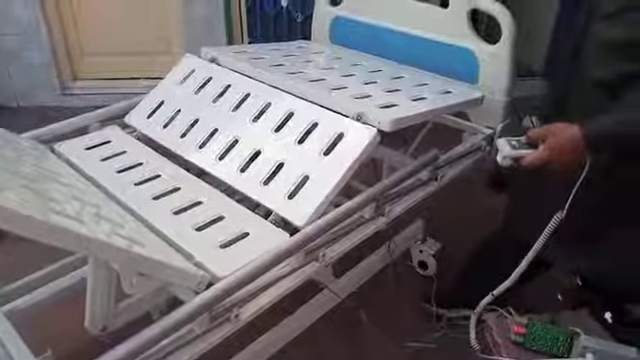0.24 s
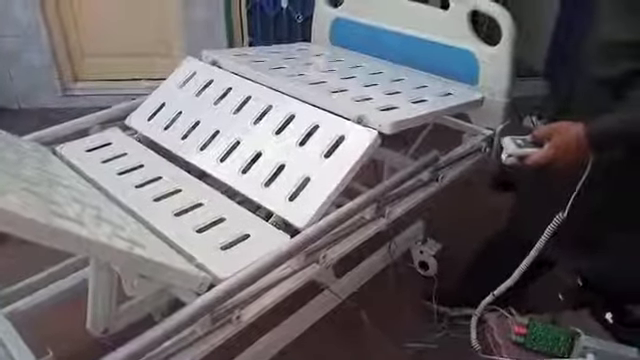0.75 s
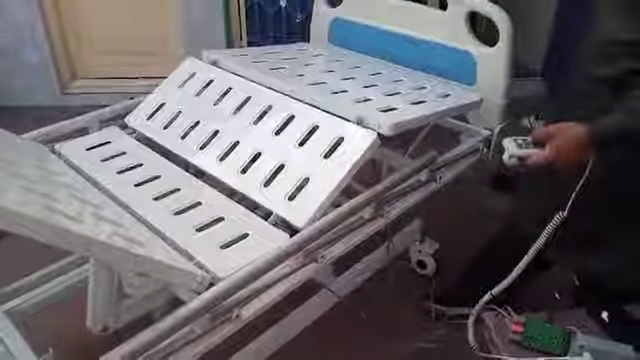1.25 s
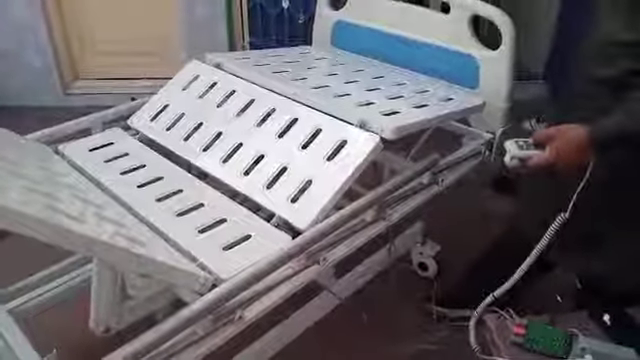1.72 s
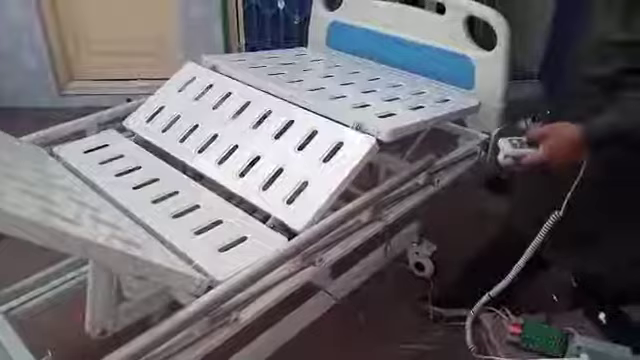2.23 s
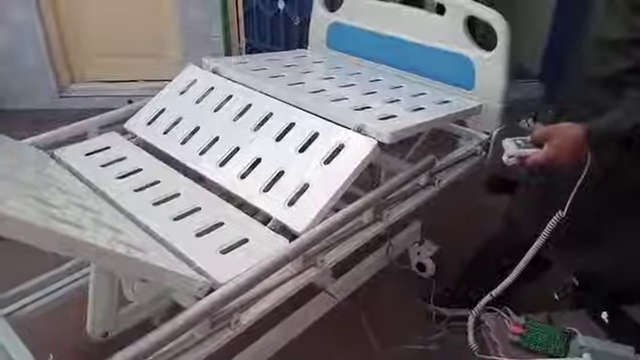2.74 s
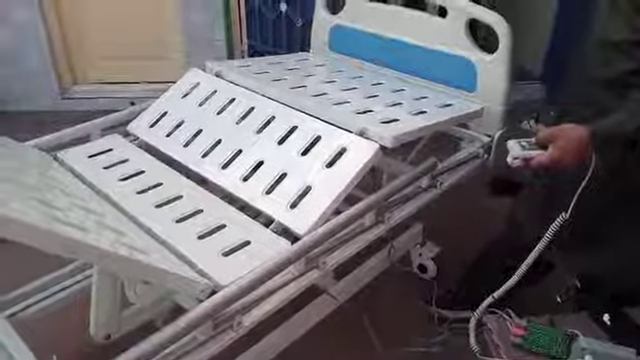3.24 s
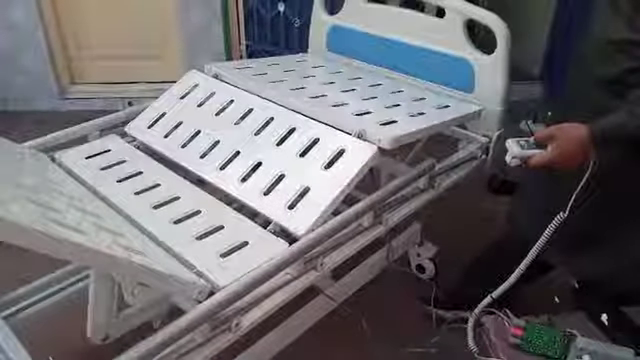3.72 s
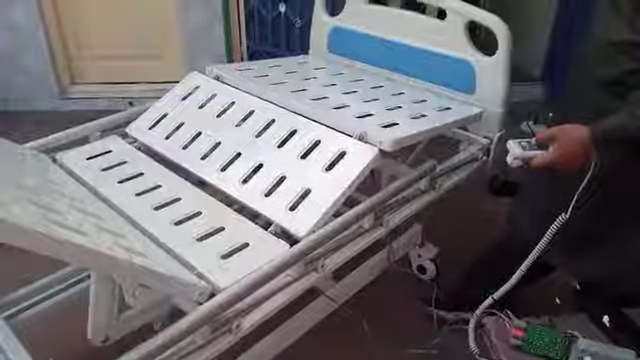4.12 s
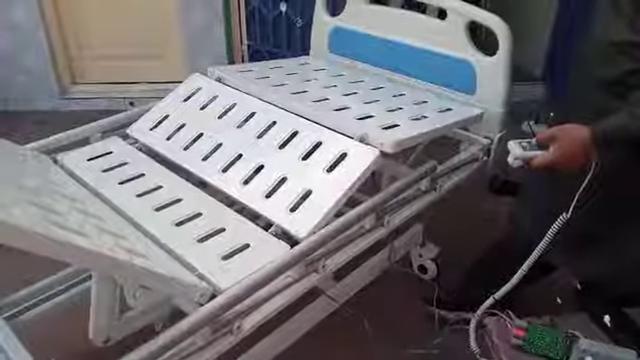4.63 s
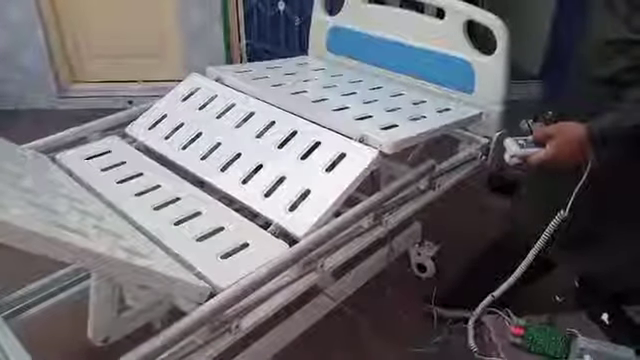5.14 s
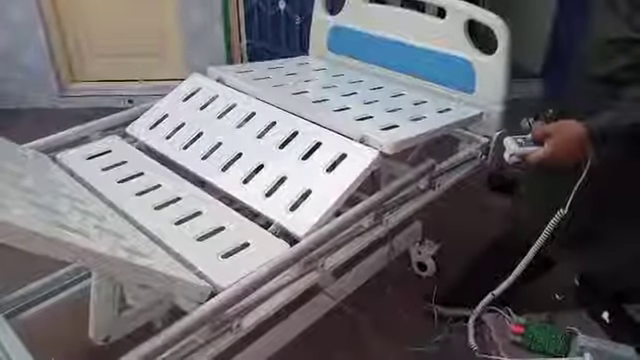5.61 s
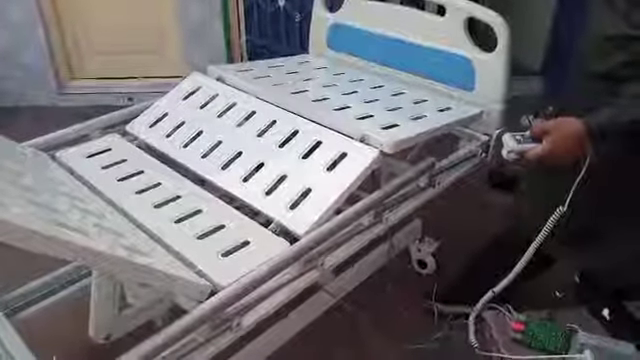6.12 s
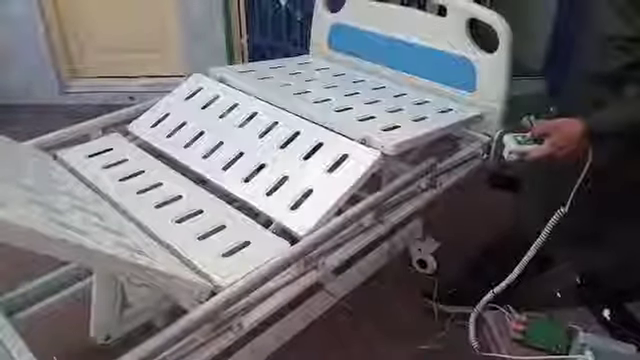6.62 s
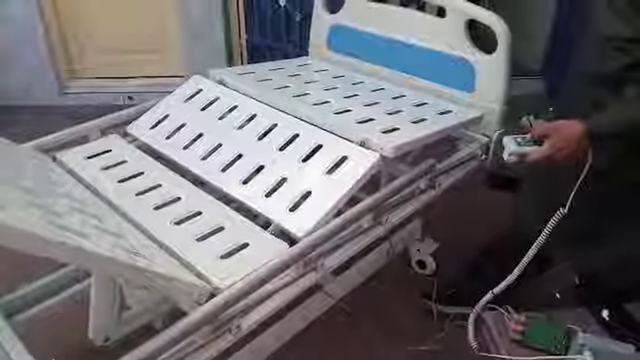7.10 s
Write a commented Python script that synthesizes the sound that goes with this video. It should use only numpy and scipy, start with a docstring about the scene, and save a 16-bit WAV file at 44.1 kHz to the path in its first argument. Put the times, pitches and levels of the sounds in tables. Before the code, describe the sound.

Close, centred pickup of a bed actuator in a small room, already running at the start and never stopping. A dense rattling hum and metallic buzz sit with a strong grainy whirr. The tone gradually shifts from two seconds as the rod slides in; the motor lightens and rises very slightly after four, thin whines surface, and it sinks back under load by about six and a half. Treble is dulled.

```python
"""The electric motor drive of a hospital bed lowers one section, close by in a small room.
From the start, its gear knocks the steel frame once a turn, about thirty times a second, and the teeth
buzz in between; brushes and worm screw add a bright whirr made of noise, over a faint room rumble.
From about 2 s the tone slowly shifts as the rod slides in. Soon after 4 s the load eases: the motor speeds
up, the buzz changes colour, and single whines sing out now and then. By 6.6 s it is loaded and slower again."""
import sys
import numpy as np
from scipy import signal
from scipy.fft import rfft, irfft
from scipy.io import wavfile

SR = 44100
rng = np.random.default_rng(int(sys.argv[2]) if len(sys.argv) > 2 else 0)


def unload_wav(signal):
    """Save mono or channel-first audio to the path in sys.argv[1] as 16-bit WAV at rate SR, clipped to [-1, 1]."""
    wavfile.write(
        sys.argv[1],
        SR,
        np.round(np.clip(np.atleast_2d(signal).T, -1, 1) * 32767).astype(np.int16),
    )


N = 324576


def from_db(db):
    """Turn decibels into a plain multiplier."""
    return 10 ** (np.asarray(db) / 20)


def rms_one(x):
    """Scale a signal to an average power of 1."""
    return x / np.sqrt(np.mean(x ** 2) + 1e-20)


def seconds():
    """Time of every sample, in seconds."""
    return np.arange(N) / SR


def spectrum_hz():
    """Frequency of every step of the whole sound's spectrum, in Hz."""
    return np.arange(N // 2 + 1) * SR / N


def at_hz(points, hz):
    """Read a curve between its points, with frequency spaced as the ear hears it (logarithmic)."""
    f, value = np.transpose(points)
    return np.interp(np.log(hz + 1), np.log(f), value)


def drift(rate):
    """Slow random wandering with spread 1: noise smoothed twice; a higher rate (Hz) wanders faster."""
    step = 100  # samples between the random draws
    warm_up = 2000  # draws thrown away while the smoothing settles
    r = np.exp(-2 * np.pi * rate * step / SR)
    noise = rng.standard_normal(N // step + 2 + warm_up)
    slow = signal.lfilter([1], [1, -2 * r, r * r], noise)[warm_up:]
    return np.interp(np.arange(N) / step, np.arange(len(slow)), rms_one(slow))


# How fast the gear turns: (t/s, speed/turns per s)
GEAR_SPEED = [(0.0, 29.66), (0.5, 29.54), (0.7, 29.32), (1.5, 29.49), (2.55, 29.52), (3.05, 29.43),
              (3.25, 29.59), (4.05, 29.57), (4.4, 29.96), (5.6, 29.8), (5.85, 29.66), (6.5, 29.67),
              (6.7, 29.34), (7.36, 29.27)]


def gear_speed():
    """The motor's speed follows its load; straight lines join the table's points."""
    t, turns_per_s = np.transpose(GEAR_SPEED)
    return np.interp(seconds(), t, turns_per_s)


def gear_slack(speed):
    """The lighter the load, the faster the gear and the more play it has: 0 loaded, 1 slack."""
    loaded_speed, slack_speed = 29.6, 29.84  # turns per s
    return np.clip((speed - loaded_speed) / (slack_speed - loaded_speed), 0, 1)


def gear_angle(speed):
    """Adding up the speed gives the angle in turns; a little drift makes the turning unsteady."""
    knock_angle = .101  # turns
    return np.cumsum(speed) / SR - knock_angle + 0.00035 * drift(11)


# Resonances that shape how the frame rings after each knock: (f/Hz, width/Hz, level/dB)
FRAME_RESONANCES = [(180, 20, 0), (289, 70, -1), (884, 210, 3)]


def ring_down_phase(hz):
    """The frame answers a blow with a delay set by its resonances: the phase at this frequency."""
    answer = 0
    for f, width, db in FRAME_RESONANCES:
        answer += from_db(db) / (1 + 1j * (hz ** 2 - f ** 2) / (hz * width))
    return np.angle(answer)


# Tones of the frame, before balancing: (multiple of the gear speed, loaded level/dB, slack level/dB)
FRAME_TONES = [(1, -59, -58), (2, -47, -45), (3, -55, -54), (4, -30, -29), (5, -23, -25), (6, -34, -41),
               (7, -31, -32), (8, -36, -35), (9, -32, -32), (10, -41, -42), (11, -33, -36), (12, -40, -35),
               (13, -47, -41), (14, -44, -45), (15, -48, -49), (16, -55, -52), (17, -54, -47),
               (18, -46, -53), (19, -45, -40), (20, -51, -46), (21, -45, -37), (22, -47, -52),
               (23, -41, -34), (24, -47, -40), (25, -40, -34), (26, -45, -49), (27, -33, -35),
               (28, -43, -50), (29, -37, -35), (30, -42, -38), (31, -34, -42), (32, -46, -41),
               (33, -38, -41), (34, -40, -36), (35, -49, -49), (36, -38, -39), (37, -42, -38),
               (38, -42, -47), (39, -43, -40), (40, -46, -43), (41, -40, -40), (42, -45, -45),
               (43, -41, -35), (44, -43, -46)]
# Tones that change as the linkage folds: (multiple of the gear speed, raised change/dB, lowered change/dB)
LINKAGE_CHANGES = [(9, 1, -1.5), (11, 1, -1), (23, -2, 2), (27, -1, 1), (29, 1, -3), (31, 1, -1),
                   (33, 2, 0), (34, -3, 2), (36, -2, 3), (43, -2, -2)]


def frame(angle, turns_per_s, slack, lowered, scatter, knock_waver_db, buzz_waver_db, phase_waver, count=14):
    """Tones at whole multiples of the gear speed: the low ones sum to the knock, the high to the buzz."""
    linkage_db = {k: up_db + lowered * (down_db - up_db) for k, up_db, down_db in LINKAGE_CHANGES}
    knock, buzz = np.zeros(N), np.zeros(N)
    for order, loaded_db, slack_db in FRAME_TONES:
        height = order / len(FRAME_TONES)
        # reflections smear the phase, most for the high tones; it wanders as the linkage moves
        fixed_smear = (order > count) * scatter * rng.standard_normal()
        smear = height * (fixed_smear + phase_waver * drift(1.7))
        phase = 2 * np.pi * order * angle + ring_down_phase(order * turns_per_s) + smear
        tone = np.cos(phase)
        level_db = loaded_db + slack * (slack_db - loaded_db) + linkage_db.get(order, 0)
        if order <= count:
            knock += tone * from_db(level_db + knock_waver_db * height * drift(3))
        else:
            buzz += tone * from_db(level_db + singing_db(order) + buzz_waver_db * drift(2.1))
    return rms_one(knock), rms_one(buzz)


def worn_surface(angle, wear_rate, size=1024, count=4):
    """The same roughness passes on every turn; the contact wanders slowly between a few tracks."""
    # smooth random tracks, each one turn long
    tracks = signal.resample(rng.standard_normal((count, size)), 4 * size, axis=1)
    around = np.linspace(0, 1, tracks.shape[1], endpoint=False)
    weights = np.array([drift(wear_rate) for track in tracks])
    weights /= np.sqrt(np.sum(weights ** 2, axis=0))  # keeps the blend's power even
    blend = np.zeros(N)
    for weight, track in zip(weights, tracks):
        blend += weight * np.interp(angle, around, track, period=1)
    return rms_one(blend)


# Tone of brushes and screw, before balancing: (f/Hz, level/dB per Hz)
WHIRR_TONE = [(90, -14), (200, 0.5), (330, 1.5), (470, -5.5), (750, 2), (1250, 1), (1700, -3.5),
              (2250, -1.5), (3100, -1), (4200, -2), (5500, -0.5), (6600, 2.5), (7300, -0.5), (7650, -15.5)]
# Part of the whirr's power that repeats on every turn: (f/Hz, share 0-1)
REPEATING_SHARE = [(300, 0), (1100, 0.22), (1450, 0.47), (2050, 0.62), (3000, 0.31), (5000, 0.3),
                   (7500, 0.48)]
# Resonances of the motor housing: (f/Hz, width/Hz, raised boost/dB, lowered boost/dB)
HOUSING_RESONANCES = [(1886, 61, 6.5, 3.5), (2005, 104, 7.5, 9), (2086, 43, 6, 2.5), (2230, 64, 3, 5),
                      (2620, 110, 3.5, 5.5), (2764, 60, 4, 4), (3323, 21, 11.5, -1), (3914, 20, 9, 8.5),
                      (4455, 24, 8, 1.5), (4750, 51, 4.5, 6), (4806, 140, 2.5, 5), (5364, 85, 7, -3.5),
                      (5480, 120, 1.5, 9), (6100, 110, 1.5, -2.5), (6310, 37, 8, 2), (6360, 50, 0.5, -2),
                      (6740, 90, -5, 0.5)]


def whirr(angle, rod_in, swell_db, half_turn_db, flutter_db):
    """Repeating roughness and fresh friction noise swell with the turn and sound through the housing."""
    hz = spectrum_hz()
    once_db = swell_db * np.cos(2 * np.pi * (angle - .68))
    twice_db = half_turn_db * np.cos(4 * np.pi * (angle - .09))
    press = from_db(once_db + twice_db + flutter_db * drift(17))
    share = np.clip(at_hz(REPEATING_SHARE, hz), 0, 1)
    repeating = 1.03 * rfft(press * worn_surface(angle, wear_rate=0.66))
    friction = rfft(press * rng.standard_normal(N))
    source = np.sqrt(share) * repeating + np.sqrt(1 - share) * friction
    source *= from_db(at_hz(WHIRR_TONE, hz))
    # the resonances trade strength as the rod slides into the housing
    raised_boost_db, lowered_boost_db = np.zeros(len(hz)), np.zeros(len(hz))
    for f, width, raised_db, lowered_db in HOUSING_RESONANCES:
        peak = 1 / (1 + (2 * (hz - f) / width) ** 2)
        raised_boost_db += raised_db * peak
        lowered_boost_db += lowered_db * peak
    raised = irfft(source * from_db(raised_boost_db), N)
    lowered = irfft(source * from_db(lowered_boost_db), N)
    return rms_one(raised + rod_in * (lowered - raised))


# Tone of the room rumble, before balancing: (f/Hz, level/dB per Hz)
RUMBLE_TONE = [(15, -9), (30, -6.5), (60, 2), (110, -0.5), (250, -11.5), (800, -33)]


def room():
    """A faint steady rumble: random noise shaped to be mostly low."""
    rumble_db = -52.5
    noise = rfft(rng.standard_normal(N))
    rumble = irfft(noise * from_db(at_hz(RUMBLE_TONE, spectrum_hz())), N)
    return from_db(rumble_db) * rms_one(rumble)


def lowering():
    """The rod slides in at an even pace, so the tone passes evenly from raised (0) to lowered (1)."""
    start_s, length_s = 1.8, 5
    return np.clip((seconds() - start_s) / length_s, 0, 1)


# Now and then one whine sings out: (t/s at its height, length/s, multiple of the gear speed, added level/dB)
SINGING_WHINES = [(4.27, 0.3, 43, 6), (4.28, 0.3, 36, 4), (4.55, 0.8, 23, 3), (5.45, 0.9, 43, 8),
                  (7.05, 0.7, 31, 4), (7.1, 0.6, 25, 6)]


def singing_db(order):
    """Smooth rise and fall in level of one frame tone each time it sings out."""
    t = seconds()
    added_db = np.zeros(N)
    for peak_s, length_s, whine_order, db in SINGING_WHINES:
        if whine_order == order:
            added_db += db * np.cos(np.pi * np.clip((t - peak_s) / length_s, -.5, .5))
    return added_db


def scene():
    """One turning gear drives knock, buzz and whirr; they and the rumble are heard at a single point."""
    speed = gear_speed()
    slack = gear_slack(speed)
    lowered = lowering()
    angle = gear_angle(speed)
    knock, buzz = frame(angle, speed.mean(), slack, lowered, scatter=2.25,
                        knock_waver_db=3.0, buzz_waver_db=1.7, phase_waver=0.48)
    # the rod's travel brings 0.85 of the housing's full change of tone
    brushes = whirr(angle, 0.85 * lowered, swell_db=0.25, half_turn_db=0.54, flutter_db=0.65)
    uneven_db = 0.51 * drift(15)  # the knocks are not equally hard
    # each level: loaded, plus the change when slack
    knock_db = -21 + 0.06 * slack + uneven_db
    buzz_db = -27 - 0.15 * slack + 2 * lowered  # the teeth bite harder as the section comes down
    whirr_db = -19.5 + 0.5 * slack
    mono = from_db(knock_db) * knock + from_db(buzz_db) * buzz + from_db(whirr_db) * brushes + room()
    return np.array([mono, mono])


def record(dry):
    """A steep filter removes the treble above its cutoff."""
    cutoff_hz = 8100
    return signal.sosfilt(signal.ellip(12, .2, 80, cutoff_hz, fs=SR, output="sos"), dry)


dry = scene()
out = record(dry)
unload_wav(out)
```